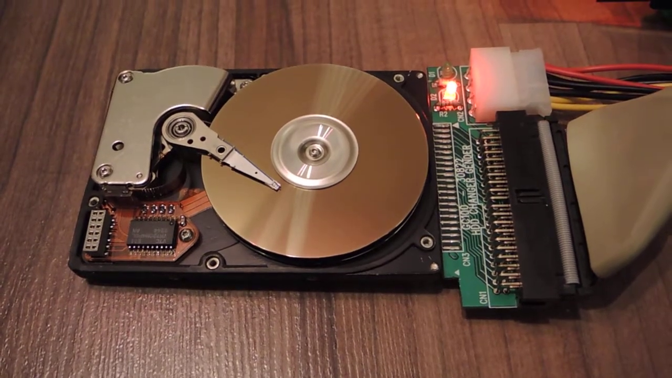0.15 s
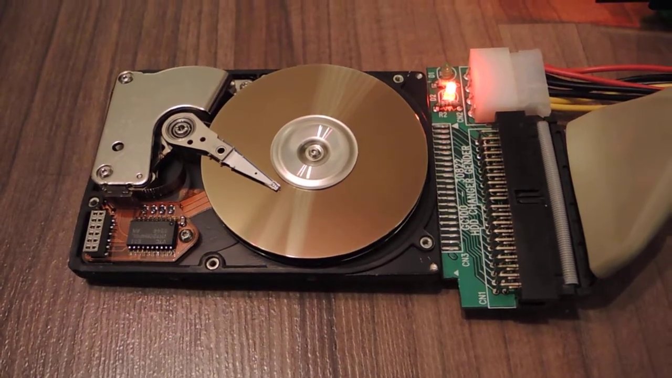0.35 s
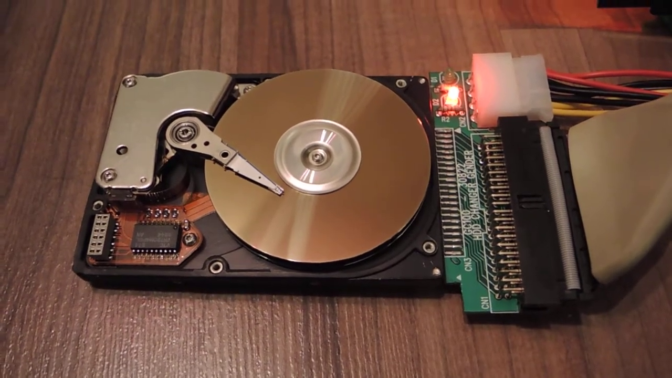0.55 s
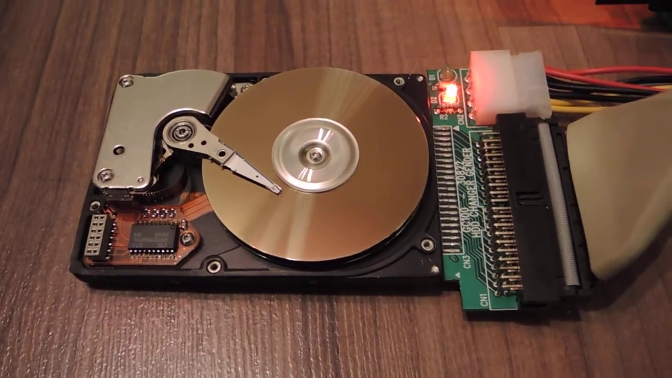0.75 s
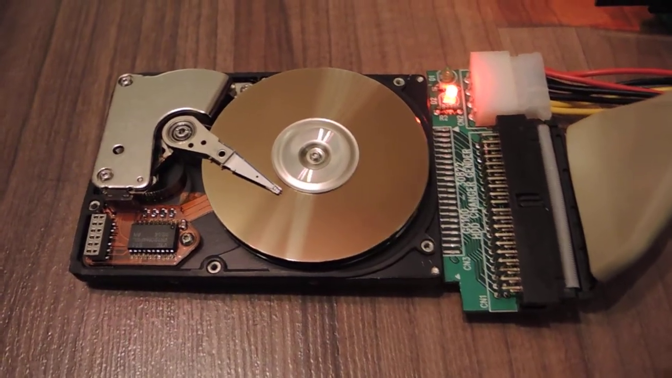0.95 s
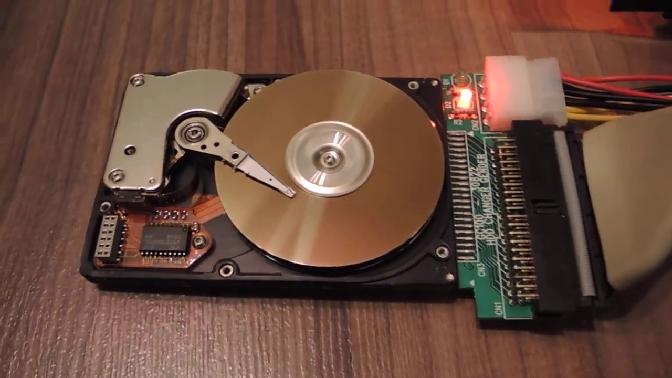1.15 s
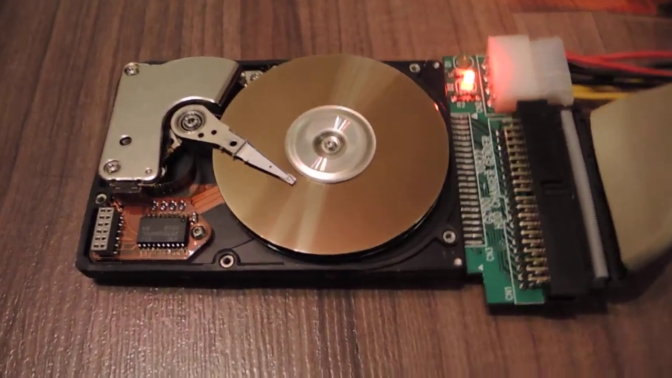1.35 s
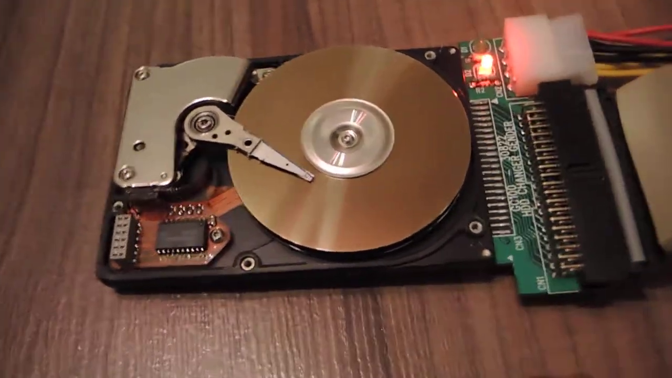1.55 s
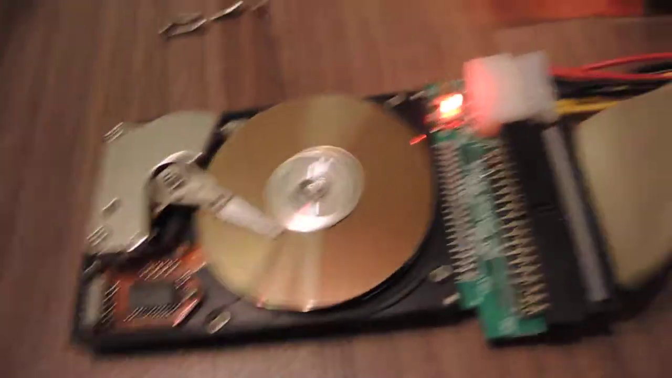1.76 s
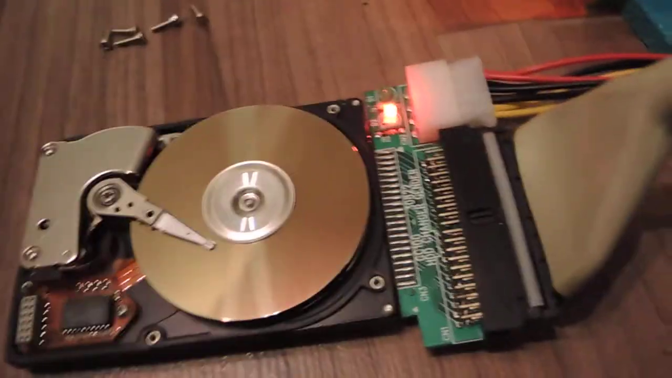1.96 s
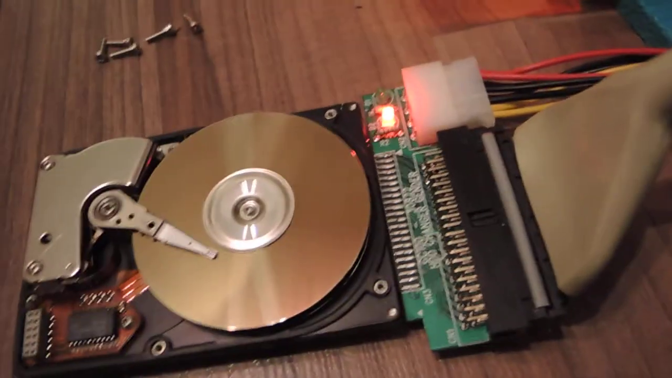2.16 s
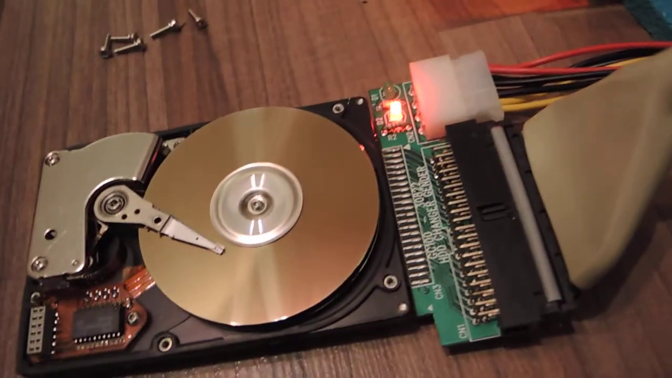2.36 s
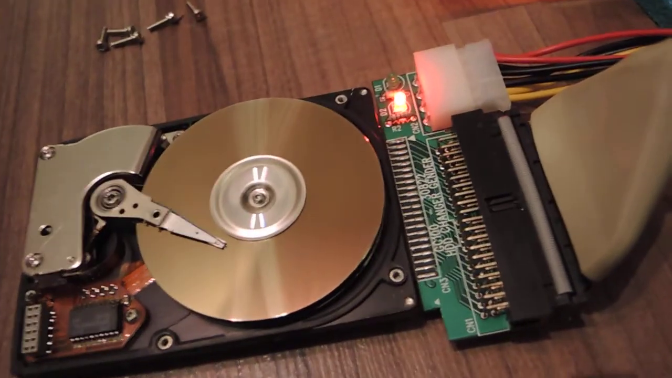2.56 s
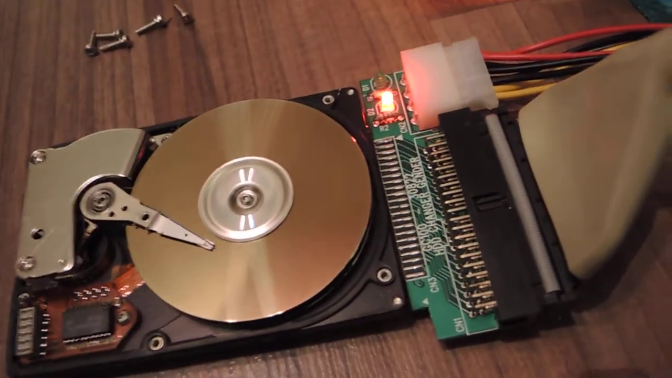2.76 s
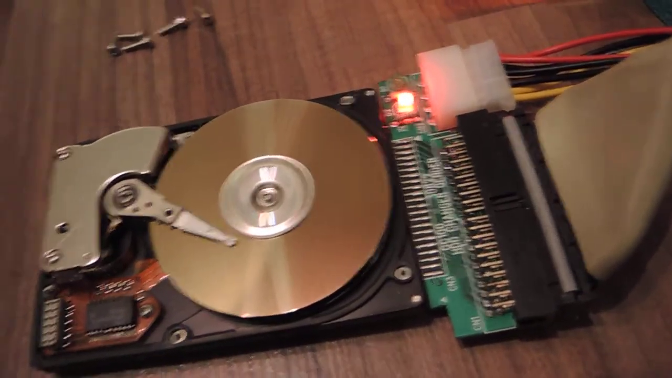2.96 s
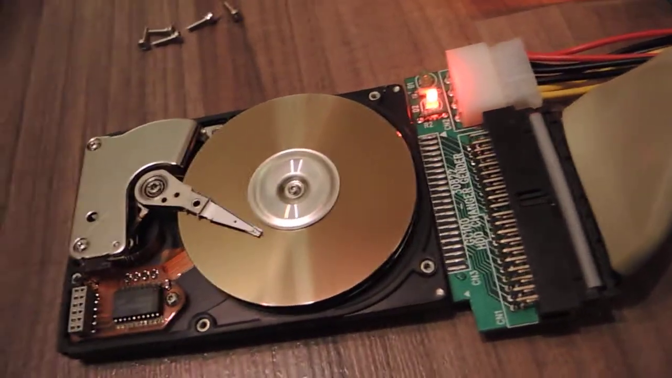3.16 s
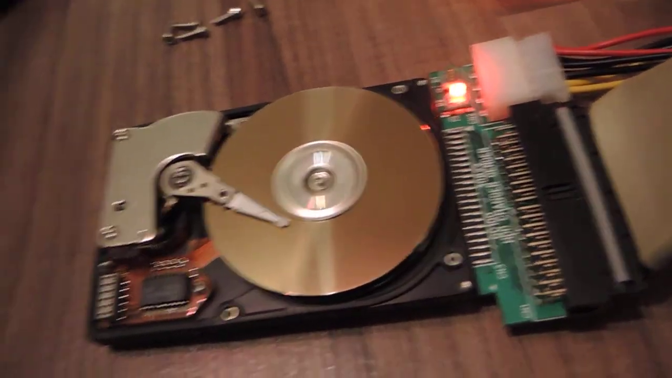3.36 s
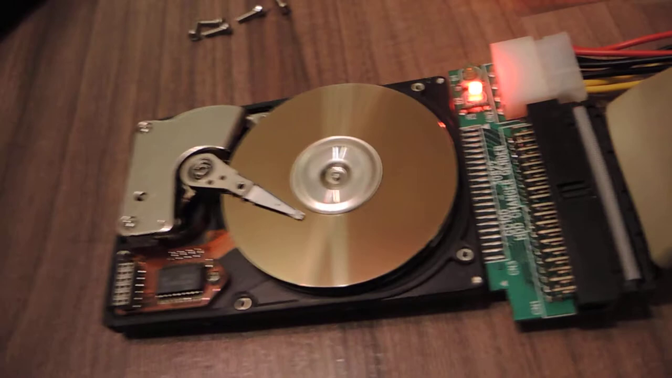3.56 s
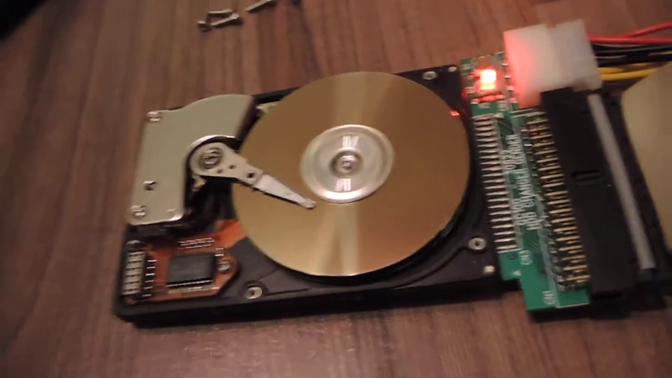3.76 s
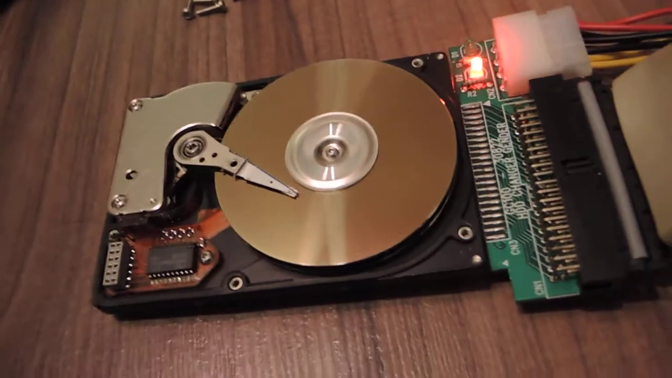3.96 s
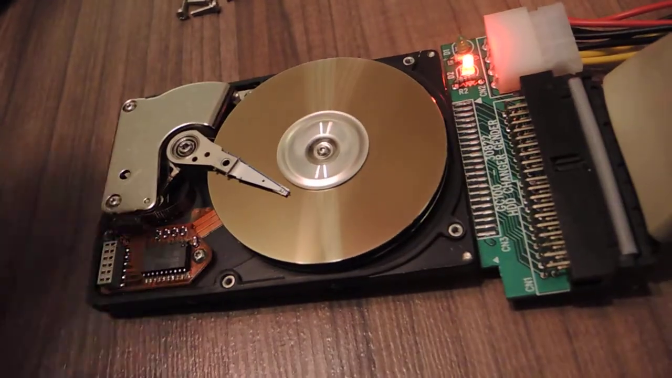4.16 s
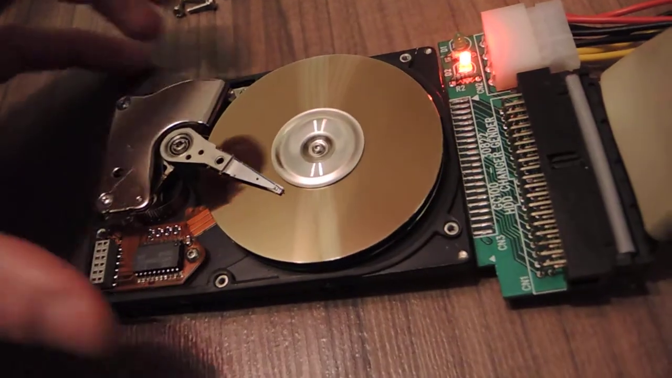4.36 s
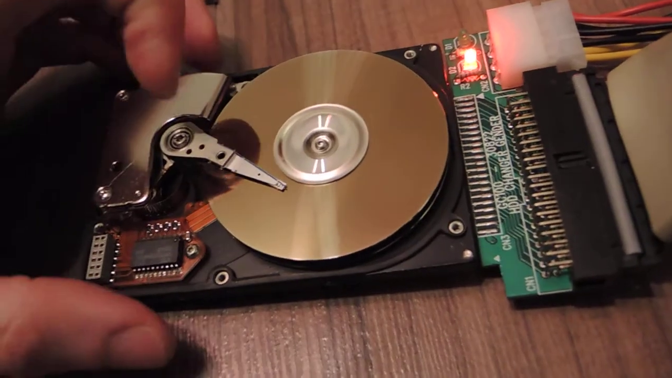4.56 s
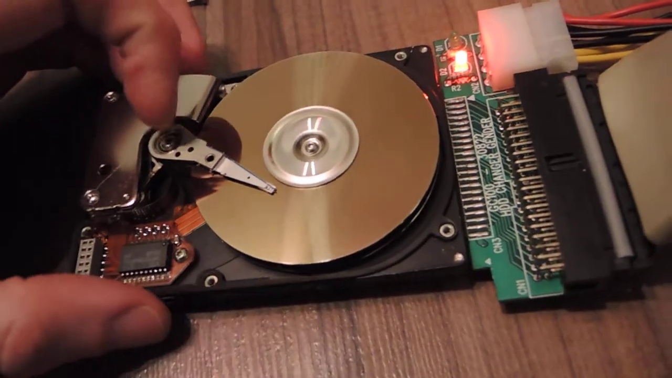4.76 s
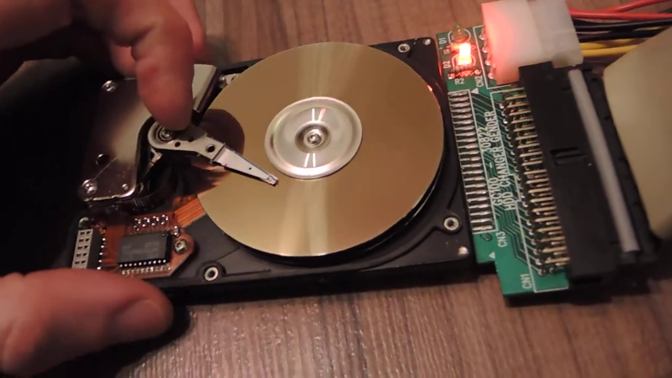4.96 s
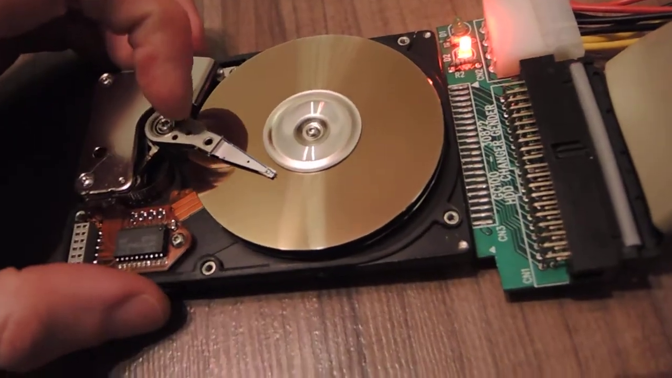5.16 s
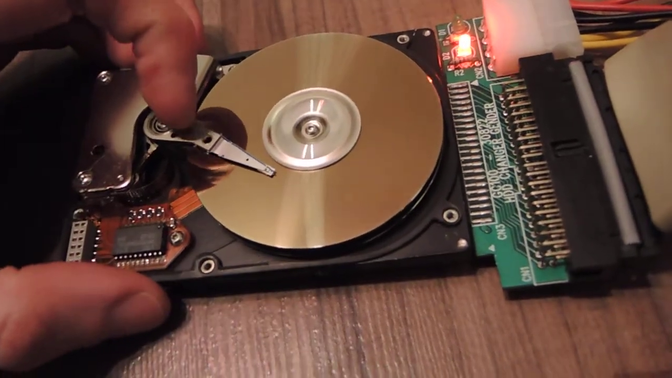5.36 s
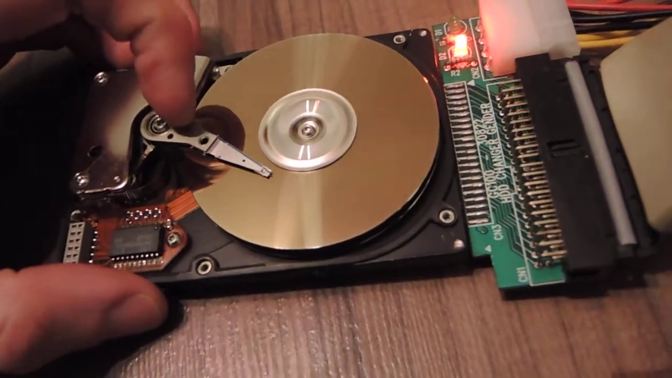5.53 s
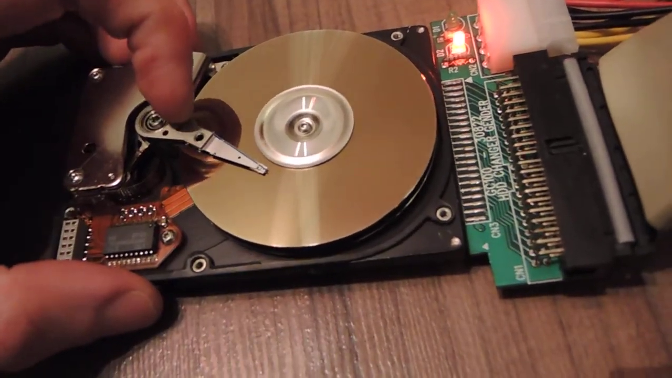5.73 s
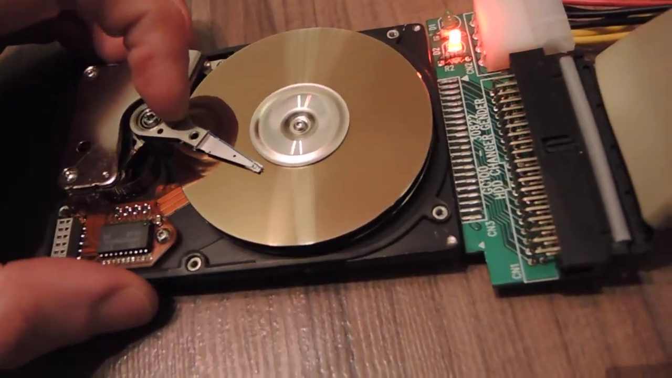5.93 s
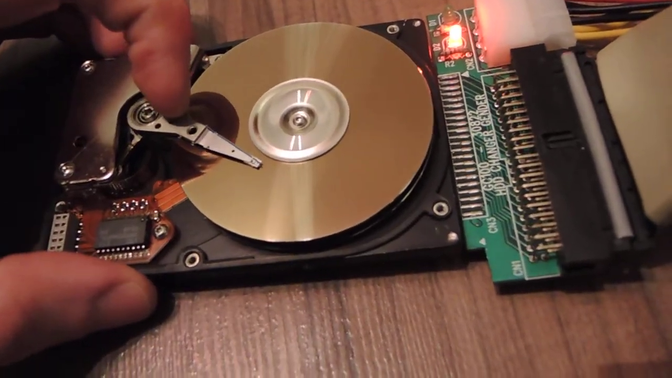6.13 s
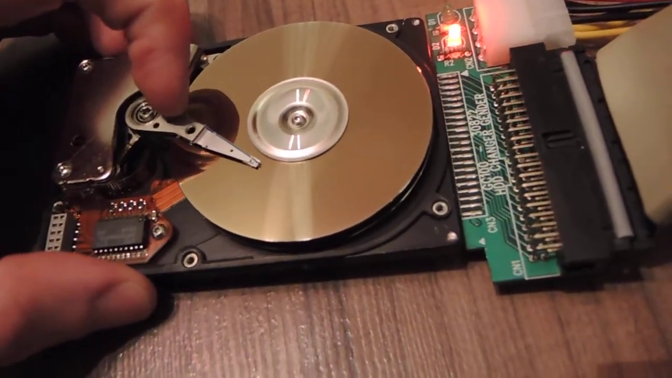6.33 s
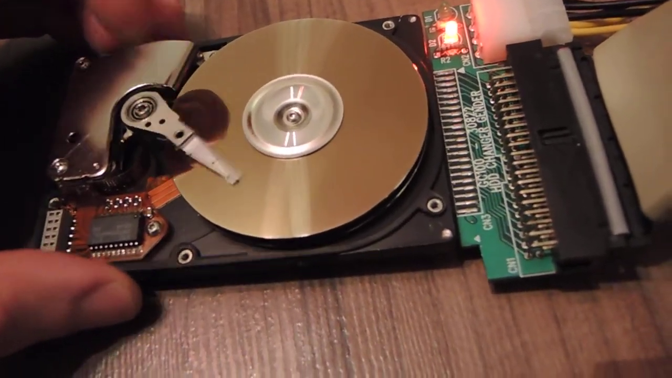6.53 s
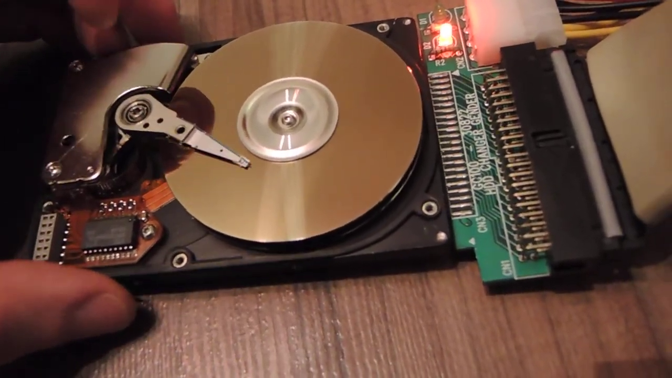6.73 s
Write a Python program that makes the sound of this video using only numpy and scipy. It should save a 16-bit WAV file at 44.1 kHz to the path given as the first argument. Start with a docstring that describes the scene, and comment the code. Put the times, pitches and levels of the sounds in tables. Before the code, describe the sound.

An opened hard drive whirs and whines steadily up close, its stuck arm buzzes harshly for two seconds, then clatters sharply when freed.

```python
"""Opened hard drive, close up

An opened hard drive runs on a wooden table, close to a stereo microphone.
The platter stirs the air as filtered noise; spindle and bearings hiss, rasp and whine as combed noise and tones.
For two seconds pulses through resonances make the stuck head arm buzz 30 times a second; its heads scrape and chirp.
The casing clicks a few times; at the end a finger frees the arm, which clatters on its stops as cracks and rings."""
import sys
import numpy as np
from scipy import signal
from scipy.fft import rfft, irfft
from scipy.io import wavfile

SR = 44100
rng = np.random.default_rng(int(sys.argv[2]) if len(sys.argv) > 2 else 0)


def dump_mix(stems):
    """Bounce the given channels to the path in sys.argv[1] as a 16-bit WAV at rate SR."""
    frames = np.atleast_2d(stems).T  # one column per channel
    limited = np.clip(frames, -1, 1)  # hard clip at full scale
    pcm = np.round(limited * 32767).astype(np.int16)
    wavfile.write(sys.argv[1], SR, pcm)


N = 299439
TIME = np.arange(N) / SR  # s
FREQS = np.maximum(np.arange(N // 2 + 1) * SR / N, 1)  # Hz

SPINDLE_HZ, BALL_PASS_HZ = 89.8, 236.0
# the kicks of the seek: first one and period in seconds
SEEK_START_S, SEEK_PERIOD_S, KICK_COUNT = 1.0911, .033251, 65
LEFT_LEAD_S = .000014  # the left side hears buzz and whine this much earlier
# Likeness of the two microphone sides. Each row: frequency in Hz, left-right likeness (1 = identical).
LIKENESS = [(30, 0.58), (110, .85), (250, 0.99), (1200, 0.92), (2400, 0.77), (4400, 0.59), (7500, 0.46),
            (9000, -0.026), (12000, 0.38)]


def from_db(db):
    """Decibels to gain."""
    return 10 ** (np.asarray(db) / 20)


def in_time(rows, times):
    """Each column of a curve at the given times."""
    s, *columns = np.transpose(rows)
    return [np.interp(times, s, column) for column in columns]


def at_hz(points, hz):
    """A curve over frequency, read on a log-frequency axis."""
    f, value = np.transpose(points)
    return np.interp(np.log(hz), np.log(f), value)


def likeness(hz):
    """How alike the two sides are at a frequency."""
    return np.clip(at_hz(LIKENESS, hz), -1, 1)


def delay(seconds):
    """The frequency response of a pure delay."""
    return np.exp(-2j * np.pi * FREQS * seconds)


def drift(rate_hz):
    """Slow random wandering with spread 1: white noise low-passed near the given rate."""
    slow = irfft(rfft(rng.standard_normal(N)) / (1 + (FREQS / rate_hz) ** 2), N)
    return slow / slow.std()


def noise(gain):
    """Stereo noise shaped by a gain per frequency; mid and side are mixed for the likeness of the sides."""
    alike = likeness(FREQS)
    mid, side = rfft(rng.standard_normal((2, N))) * gain * np.sqrt(SR / 2)
    side_share = np.sqrt((1 - alike) / (1 + alike + 1e-6))
    return irfft(mid + side_share * side * [[1], [-1]], N)


def recurring(hz, share):
    """Comb gain of noise that partly comes round again on every turn, some orders far more than others."""
    orders = np.arange(FREQS[-1] / hz + 2) * hz
    order_shares = share * rng.exponential(1, len(orders))
    share = np.clip(np.interp(FREQS, orders, order_shares), 0, .7)
    return np.sqrt(1 - share ** 2) / np.abs(1 - share * delay(1 / hz))


def resonances(modes):
    """Gain per frequency of overlapping resonances (Hz, width Hz, dB), summed as power."""
    power = 0
    for hz, width, db in modes:
        power = power + from_db(db) ** 2 / (1 + ((FREQS - hz * hz / FREQS) / width) ** 2)
    return np.sqrt(power)


def causal(gain):
    """The response with this gain that only rings after its cause (minimum phase)."""
    cepstrum = irfft(np.log(gain + 1e-9), N)
    first_half = np.arange(N) < N // 2
    return gain * np.exp(1j * rfft(2 * cepstrum * first_half).imag)


def ring(hits, modes, rise_s=0.00055, size=16000):
    """Damped sines set off by each hit (s, dB), a little differently every time and on each side."""
    out = np.zeros((2, N + size))
    t = np.arange(size) / SR
    hz, mode_db, t60 = np.transpose(modes)[:, :, None]
    apart = np.arccos(likeness(hz))
    decay = np.exp(-np.log(1000) * t / t60)
    rise = 1 - np.exp(-t / rise_s)
    for s, db in hits:
        phase = rng.uniform(0, 2 * np.pi, hz.shape) + apart * rng.normal(0, 0.51, (2, len(hz), 1))
        height = from_db(db + mode_db + rng.normal(0, 1, hz.shape)) * decay
        at = round(s * SR)
        out[:, at:at + size] += (height * np.sin(2 * np.pi * hz * t + phase)).sum(1) * rise
    return out[:, :N]


def crack(hits, colour, rise_ms=0.16):
    """The dense, quickly dying modes of a hard contact (s, dB, decay ms), as coloured noise bursts."""
    dense = noise(from_db(at_hz(colour, FREQS)))
    envelope = np.zeros(N)
    for s, db, decay_ms in hits:
        age_ms = np.maximum(TIME - s, 0) * 1000
        rise = 1 - np.exp(-age_ms / rise_ms)
        envelope += from_db(db) * rise * np.exp(-np.minimum(age_ms / decay_ms, 20) ** 0.94)
    return envelope * dense / dense.std()


def spinning(rough):
    """Wind of the platter, hiss that recurs with each turn, rasp that recurs with each bearing ball."""
    # Air stirred by the platter, before a treble loss. Each row: frequency in Hz, level in dB per Hz.
    wind_colour = [(25, -97), (45, -93), (66, -77.5), (90, -81.5), (130, -73.5), (230, -71), (335, -61.5),
                   (420, -66.5), (570, -65.5), (800, -74), (1300, -80.5), (2500, -80.5)]
    # Spindle hiss, before humps and comb. Each row: frequency in Hz, level in dB per Hz.
    hiss_colour = [(400, -104), (1000, -81), (2600, -78.5), (3700, -79), (4700, -76), (5200, -84),
                   (6600, -81.5), (8400, -86), (9600, -85.5), (10600, -82), (11900, -81), (12300, -100),
                   (14000, -100), (15000, -115)]
    # Frame resonances that lift the hiss. Each row: frequency in Hz, width in Hz, lift in dB.
    hiss_humps = [(4520, 180, 3.1), (7450, 340, 11.1), (10800, 200, 5.4), (11730, 190, 9.1)]
    # Rasp of the bearing balls, before comb and swells. Each row: frequency in Hz, level in dB per Hz.
    rasp_colour = [(900, -82.5), (2400, -71.5), (3400, -78), (4500, -82), (5400, -77), (6600, -85),
                   (7300, -72), (8300, -72.5), (9700, -81.5), (11000, -73), (11800, -77), (12400, -100)]
    humps_db = sum(db / (1 + (2 * (FREQS - hz) / width) ** 2) for hz, width, db in hiss_humps)
    wind = noise(from_db(at_hz(wind_colour, FREQS)) / (1 + (FREQS / 3000) ** 2))
    hiss_gain = from_db(at_hz(hiss_colour, FREQS) + humps_db)
    hiss = noise(hiss_gain * recurring(SPINDLE_HZ, share=0.3))
    rasp_gain = from_db(at_hz(rasp_colour, FREQS))
    rasp = noise(rasp_gain * recurring(BALL_PASS_HZ, share=0.37))
    # the rasp rises while the bearing is rough and while the arm shakes the frame
    shaken = (TIME > SEEK_START_S) & (TIME < SEEK_START_S + KICK_COUNT * SEEK_PERIOD_S)
    rasp_db = -11 + 4 * rough + 3.2 * shaken
    hiss_flutter = from_db(.5 * drift(24))
    return wind + hiss * hiss_flutter + rasp * from_db(rasp_db + 2.6 * drift(8))


def roughness():
    """How roughly the bearing runs: uneven, about 1 at first, dying away towards 0 as it settles."""
    # Uneven grinding of the bearing. Each row: time in seconds, level in dB (only its swings count).
    grinding = [(0.0, -48), (0.134, -39.5), (0.33, -40.5), (0.47, -50), (0.634, -51), (0.656, -42.5),
                (0.95, -46.5)]
    settle_from_s, settle_s = 1.4, 0.74  # start and time constant
    span_db = 8  # dB of grinding that make one unit of roughness
    grinding_db, = in_time(grinding, TIME)
    uneven = (grinding_db - grinding_db[TIME < grinding[-1][0]].mean()) / span_db
    return (1 + uneven) * np.exp(-np.maximum(TIME - settle_from_s, 0) / settle_s)


def whine(rough, flutter_db=2.0, wander_rad=0.4, motor_db=-0.18, bearing_db=-1.0):
    """Fluttering sines: the bearing's mostly fade as it settles, the motor's are slightly quieter at first."""
    # Tones of the motor. Each row: frequency in Hz, rms level in dB before motor_db and the early softening.
    motor_tones = [(203, -54.5), (1077, -52.5), (1483, -50.5), (2155, -49.5), (2690, -50.5), (3370, -51.5),
                   (3640, -52.5), (4307, -53), (5469, -61), (5615, -61), (6736, -50.5), (7860, -56),
                   (8333, -56.5), (8382, -58), (8985, -59)]
    # Tones of the rough bearing. Each row: multiple of the ball pass rate, rms level in dB before bearing_db.
    ball_tones = [(2, -51), (4, -54), (6, -55), (7, -56), (10, -51), (11, -53), (13, -53), (14, -51),
                  (15, -54), (16, -55), (17, -48), (18, -53.5), (19, -46.5), (20, -52), (21, -55),
                  (31, -52.5)]
    # What the bearing tones lose as it settles. Each row: frequency in Hz, loss in dB.
    settling_loss = [(500, -0.5), (950, 1), (1400, 4), (2500, 7), (3700, 5), (4400, 4.5), (7300, 3)]
    motor_early_db = -0.5  # motor tones are slightly quieter at first; follows the roughness curve
    tones = [(hz, motor_db + db + motor_early_db * rough) for hz, db in motor_tones]
    for multiple, db in ball_tones:
        hz = multiple * BALL_PASS_HZ
        tones.append((hz, bearing_db + db - at_hz(settling_loss, hz) * (1 - rough)))
    slow = np.array([drift(8.5) for _ in range(6)])
    out = np.zeros((2, N))
    for hz, db in tones:
        # each tone takes its flutter from shifted copies of the shared drifts
        swell, wander = (np.roll(slow[rng.integers(6)], rng.integers(N)) for _ in range(2))
        gain = from_db(db + flutter_db * swell)
        phase = 2 * np.pi * (hz * TIME + rng.random()) + wander_rad * wander
        apart = np.pi * hz * LEFT_LEAD_S + rng.normal(0, 0.11) * np.arccos(likeness(hz))
        out += np.sqrt(2) * gain * np.sin([phase + apart, phase - apart])
    return out


def seek(level_db=0.0, bending_lag=.14, echo_s=0.00197, echo_share=0.1, return_treble_db=2.0,
         soft_hz=10500, snap_scatter_db=1.9):
    """The coil kicks the stuck arm out and back; bending waves bring the treble first."""
    # Arm and frame under the kicks. Each row: frequency in Hz, width in Hz, level in dB.
    arm_modes = [(380, 170, -13), (884, 70, -0.5), (1453, 35.7, 16), (1594, 52, 5.5), (2535, 170, 7.5),
                 (3310, 180, 2.5), (3540, 140, 6), (4090, 150, 9), (4590, 250, 9.5), (5300, 550, -12),
                 (6330, 630, -4), (7100, 240, 3.5), (7770, 154, 9.5), (8600, 340, -3), (8630, 375, 8.5),
                 (9000, 440, 3)]
    return_lag_s, return_db = .00948, -4  # the return kick is later and weaker
    kick_start_db, kick_build_s = -2.5, .3  # the kicks start weaker and build up
    # the snap stays bright for a while, then fades with a time constant to dull
    snap_bright_db, snap_hold_s, snap_fade_s, snap_dull_db = 6.5, 0.56, 0.38, -0.9
    arm_trip_s, arm_reflection = .00065, .6  # wave's round trip along the arm, share its end reflects
    age = SEEK_PERIOD_S * np.arange(KICK_COUNT)
    starts = SEEK_START_S + age
    kick_db = kick_start_db * np.exp(-age / kick_build_s)
    bright = np.exp(-np.maximum(age - snap_hold_s, 0) / snap_fade_s)
    bright[-1] = 1  # the last kick snaps fully and has no return
    treble_db = snap_dull_db + (snap_bright_db - snap_dull_db) * bright
    treble_db = treble_db + rng.normal(0, snap_scatter_db, KICK_COUNT)
    at = np.round(np.r_[starts, starts[:-1] + return_lag_s] * SR).astype(int)
    force_db = np.r_[kick_db, kick_db[:-1] + return_db] + level_db + rng.normal(0, .8, len(at))
    snap_db = force_db + np.r_[treble_db, np.full(KICK_COUNT - 1, return_treble_db)]
    direction = np.r_[np.ones(KICK_COUNT), -np.ones(KICK_COUNT - 1)]
    push, snap = np.zeros((2, N))
    push[at] = direction * from_db(force_db)
    snap[at] = direction * from_db(snap_db)
    treble = 1 / (1 + (5500 / FREQS) ** 4)
    # the dull part of each kick runs to and fro along the arm and echoes off the table; the snap leaves at once
    trip = delay(arm_trip_s)
    to_and_fro = (arm_reflection - trip) / (1 - arm_reflection * trip)
    table_echo = 1 + echo_share * delay(echo_s)
    force = rfft(push) * (1 - treble) * to_and_fro * table_echo + rfft(snap) * treble
    arm = causal(resonances(arm_modes) / np.sqrt(1 + (FREQS / soft_hz) ** 16))
    left = force * arm * delay(bending_lag / np.sqrt(FREQS + 200))
    return irfft(np.array([left, left * delay(LEFT_LEAD_S)]), N)


def heads():
    """The trembling heads scrape on the platter in one swell of resonant noise, and chirp once."""
    # Resonances of the scrape, before its swell. Each row: frequency in Hz, width in Hz, level in dB per Hz.
    scrape_modes = [(4260, 320, -66), (4500, 180, -68), (7130, 380, -75), (8900, 600, -77)]
    # The chirp of a head. Each row: start in seconds, level in dB.
    chirp = [(1.6115, -21)]
    # What the chirp rings with. Each row: frequency in Hz, level in dB, t60 in seconds.
    chirp_modes = [(3600, -2, 0.039), (2900, -6, 0.033)]
    full_s, hold_s = 1.49, .12
    rise_db_per_s, fall_db_per_s = 63, 130
    early = np.maximum(full_s - TIME, 0)
    late = np.maximum(TIME - full_s - hold_s, 0)
    scrape_db = -2 - rise_db_per_s * early - fall_db_per_s * late
    scrape = noise(resonances(scrape_modes) / (1 + (FREQS / 11000) ** 12))
    return scrape * from_db(scrape_db + 3.9 * drift(40)) + ring(chirp, chirp_modes)


def freed_arm():
    """The arm slams and rebounds: each contact cracks, and platter and stops ring on."""
    # Hits on the stops. Each row: start in seconds, crack in dB, platter ring in dB, stop ring in dB.
    clacks = np.array([(6.443, -13, -15.5, -14), (6.454, 8.5, -8, -5), (6.457, -7, -6.5, -10),
                       (6.4672, 2, -4, -23), (6.4741, -0.5, -22, -16), (6.479, -8, -22, -16),
                       (6.5869, -0.5, -21, 0.5), (6.6595, -3.5, -20, -3.5), (6.689, -4.5, -34, -7.5),
                       (6.6975, -11, -16, -6), (6.702, -15.5, -37, -14), (6.7066, -11, -43, -28)])
    # Colour of the cracks. Each row: frequency in Hz, relative level in dB.
    clack_colour = [(30, -40), (450, -9), (750, -13.5), (1300, -6.5), (2400, -8.5), (3600, -5), (4800, 4.5),
                    (5700, -12), (7200, 4.5), (7900, -2), (9200, 6), (10700, -5), (12500, -13),
                    (16000, -34)]
    # What the platter rings with. Each row: frequency in Hz, level in dB, t60 in seconds.
    platter_modes = [(1200, -16, .03), (2700, -14, .15), (2748, -0.5, 0.037), (3550, -11, 0.036),
                     (4323, -26, 0.33), (5070, -20.5, 0.2), (7210, -19, 0.086), (7800, -22, .1),
                     (8460, -11, 0.028), (9430, -5, 0.033), (10450, -12, 0.037)]
    # What the stops ring with. Each row: frequency in Hz, level in dB, t60 in seconds.
    stop_modes = [(1780, -13, 0.018), (2400, -3.5, 0.014), (2890, -12.5, 0.024), (3610, -7.5, 0.019),
                  (3980, -13, .018), (4740, -12, .022), (4910, -0.5, 0.026), (7050, -6, 0.012),
                  (8940, 4.5, 0.0059), (9710, -7, 0.011)]
    decay_ms = 2.2
    contacts = [(s, db, decay_ms) for s, db in clacks[:, :2]]
    cracks = crack(contacts, clack_colour)
    platter = ring(clacks[:, [0, 2]], platter_modes)
    return cracks + platter + ring(clacks[:, [0, 3]], stop_modes)


def casing():
    """Each click cracks and rings the metal casing and thumps the table, which answers more slowly."""
    # Small clicks. Each row: start in seconds, crack in dB, decay in ms, casing ring in dB, table thump in dB.
    clicks = np.array([(.745, -27, 2, -60, -34), (0.98, -17, 3.3, -56, -55), (1.0302, -15, 1.1, -55, -60),
                       (1.0356, -19.5, 1.5, -55, -60), (1.613, -22, 3.3, -35, -37),
                       (2.142, -24, 1.5, -46, -43), (2.1485, -17, 4, -33, -33),
                       (3.5451, -14, 2.2, -50, -16.5), (3.573, -14.5, 2.6, -57, -17),
                       (3.608, -24, 2, -50, -45), (3.6199, -31, 3, -42, -27.5),
                       (3.728, -11, 4.1, -15.5, -33)])
    # Colour of the clicks. Each row: frequency in Hz, relative level in dB.
    click_colour = [(100, -8), (900, 2), (1800, -3), (3500, -2), (6300, 1.5), (9000, -0.5), (11500, -3.5),
                    (13000, -12), (16000, -45)]
    # What the casing rings with. Each row: frequency in Hz, level in dB, t60 in seconds.
    case_modes = [(967, -9, 0.058), (1876, -2.5, 0.065), (2390, 8, 0.015), (3220, 2, 0.025),
                  (4130, -1, .025), (4900, 4, 0.021), (6250, -14, 0.13), (7640, -18, .03),
                  (11400, -10, .015)]
    # What the table rings with. Each row: frequency in Hz, level in dB, t60 in seconds.
    table_modes = [(70, -26, .12), (181, -8, 0.022), (320, 2.5, 0.038), (420, -2, 0.027),
                   (616, -8.5, 0.033), (1030, -7, 0.027), (1280, -14.5, 0.057)]
    cracks = crack(clicks[:, :3], click_colour, rise_ms=0.42)
    metal = ring(clicks[:, [0, 3]], case_modes, rise_s=0.00054)
    return cracks + metal + ring(clicks[:, [0, 4]], table_modes, rise_s=0.0015)


def room(x, near_db, far_db, near_t60=0.012, far_t60=0.25, size=14000):
    """Quick scatter from table and drive, then the faint tail of a small room, as decaying noise."""
    t = np.arange(size) / SR
    response = 0
    for db, t60, start_s in ((near_db, near_t60, .0015), (far_db, far_t60, .006)):
        tail = rng.standard_normal((2, size)) * np.exp(-np.log(1000) * t / t60) * (t > start_s)
        response = response + from_db(db) * tail / np.sqrt((tail ** 2).sum(1, keepdims=True))
    return x + signal.fftconvolve(x, response, axes=1)[:, :N]


def scene():
    """All parts of the drive, each pitch radiating a little to one side."""
    # Balance of the two sides. Each row: frequency in Hz, left minus right in dB.
    balance = [(100, -2), (1200, 0.1), (2600, -1.5), (4500, -0.5), (7000, 1.5), (12000, -0.5)]
    halves = np.array([[.5], [-.5]])
    arm_pan_db = -1.2  # left minus right: arm and knocks sit a little to the right
    buzz = room(seek(), near_db=-9.0, far_db=-22)
    knocks = room(casing() + freed_arm(), near_db=-15.5, far_db=-17.0)
    rough = roughness()
    drive = spinning(rough) + whine(rough) + heads()
    drive = drive + (buzz + knocks) * from_db(arm_pan_db * halves)
    return irfft(rfft(drive) * from_db(at_hz(balance, FREQS) * halves), N)


def record(dry):
    """The microphone drops the deepest bass and overloads on the hardest clacks; the top is cut."""
    low_cut_hz, top_cut_hz = 30, 16300
    low_cut = signal.butter(2, low_cut_hz, "high", fs=SR, output="sos")
    top_cut = signal.cheby2(12, 60, top_cut_hz, fs=SR, output="sos")
    heard = signal.sosfilt(low_cut, dry)
    overloaded = heard / (1 + heard ** 6) ** (1 / 6)
    return signal.sosfilt(top_cut, overloaded)


dry = scene()
out = record(dry)
dump_mix(out)
```